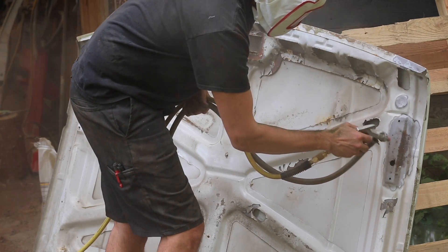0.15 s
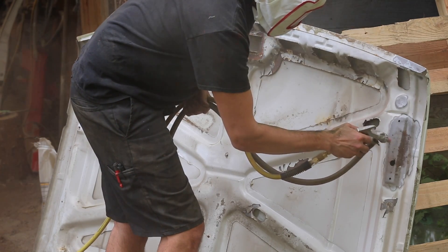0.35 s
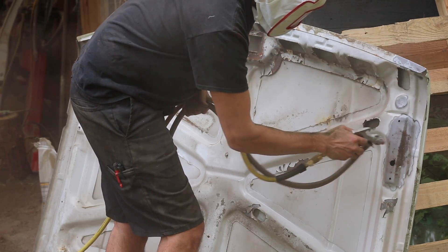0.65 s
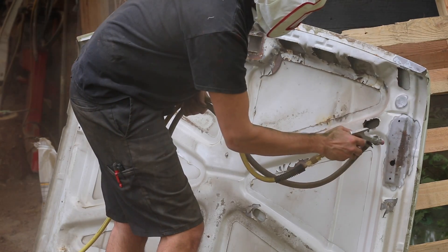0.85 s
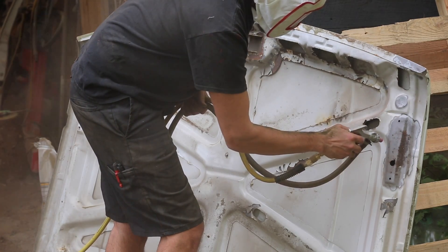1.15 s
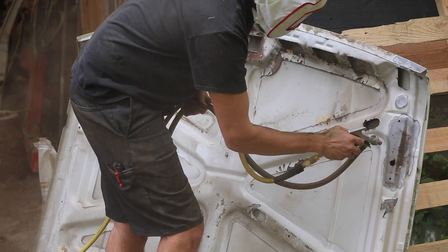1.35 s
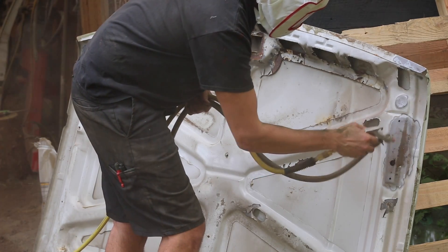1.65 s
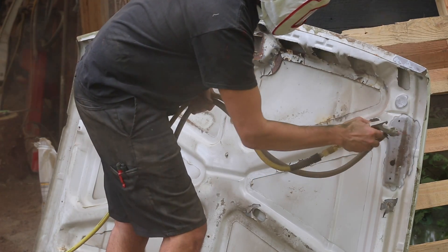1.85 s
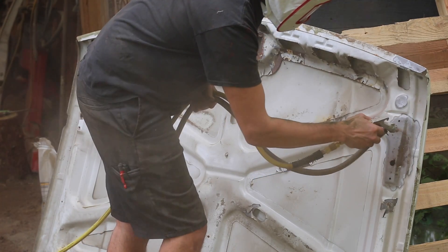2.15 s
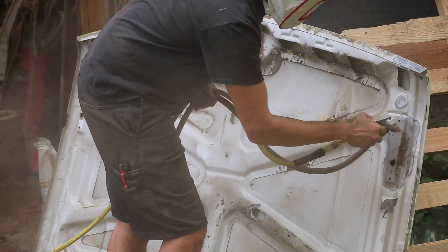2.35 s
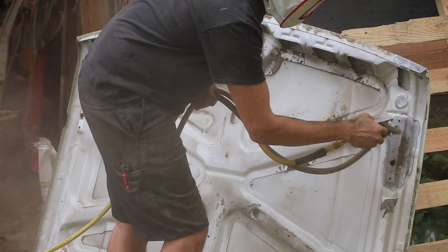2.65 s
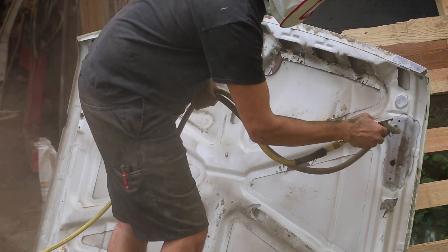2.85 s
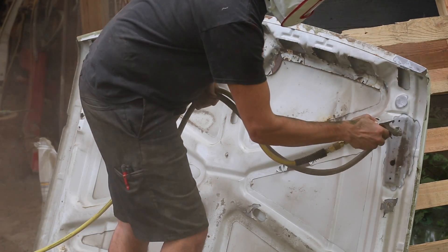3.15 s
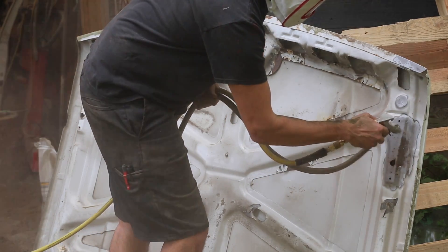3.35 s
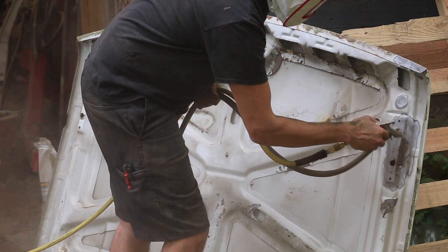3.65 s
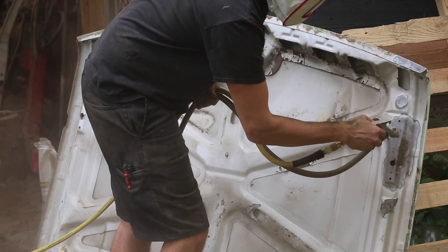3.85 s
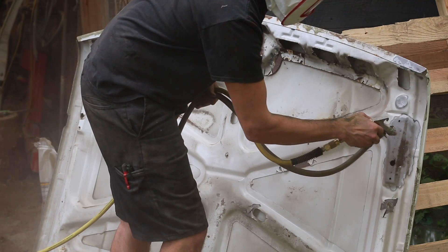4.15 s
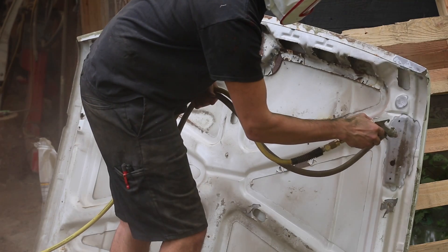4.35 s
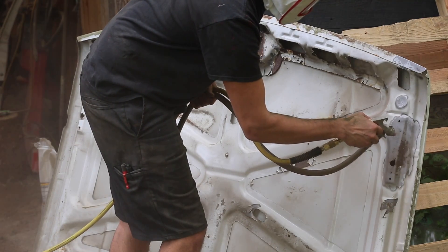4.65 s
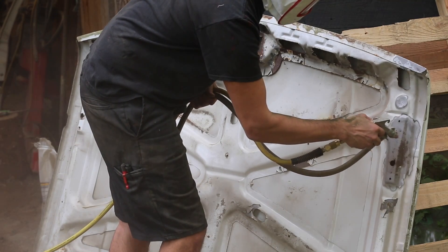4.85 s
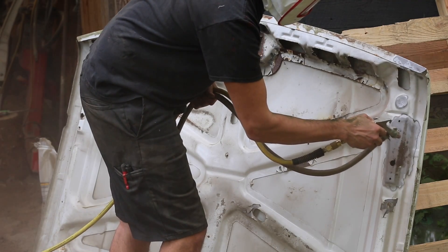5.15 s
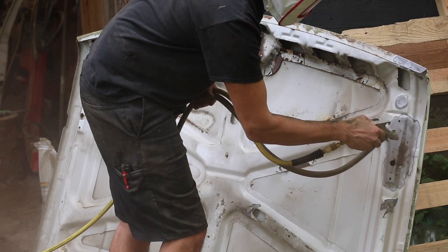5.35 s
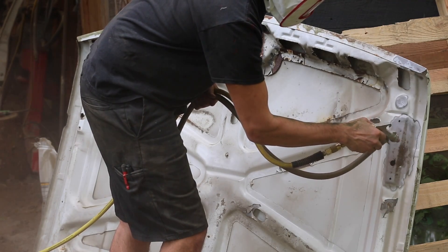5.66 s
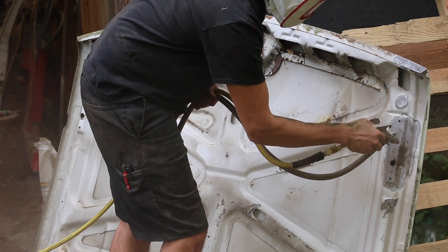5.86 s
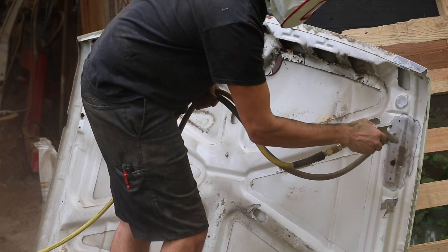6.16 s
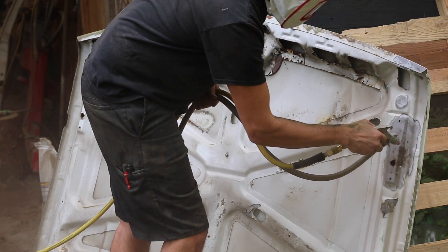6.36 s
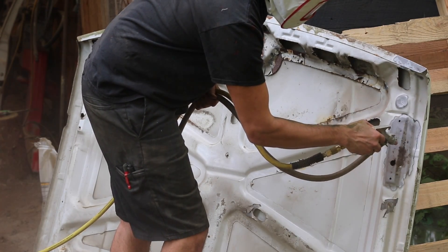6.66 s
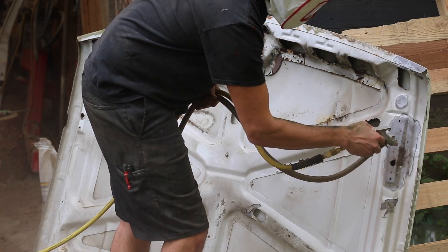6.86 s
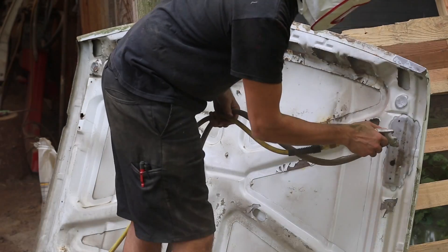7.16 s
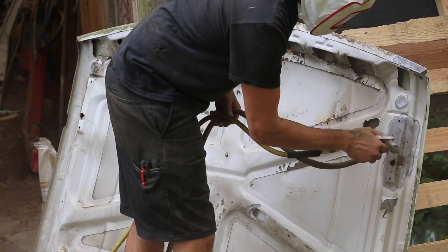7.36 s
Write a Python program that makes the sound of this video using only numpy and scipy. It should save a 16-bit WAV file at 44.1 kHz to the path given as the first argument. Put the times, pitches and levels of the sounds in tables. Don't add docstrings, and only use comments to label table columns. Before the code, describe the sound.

In a barn, a hand-held blasting gun sprays grit nonstop against a bare, pressed steel vehicle panel. The bright hiss swells and dips about four times a second as the wrist sweeps. Grains rattle thinly, hollows answer with short hollow roars and breathy hoots. A piston compressor drones very faintly far off. One close microphone, almost mono, gets buffeted by low air in the last second or so.

```python
import sys
import numpy as np
from scipy import signal
from scipy.fft import rfft, irfft, next_fast_len
from scipy.io import wavfile
from scipy.ndimage import uniform_filter1d, map_coordinates

SR = 44100
rng = np.random.default_rng(int(sys.argv[2]) if len(sys.argv) > 2 else 0)


def store_wav(level_fs):
    pcm = np.round(np.clip(np.atleast_2d(level_fs), -1, 1) * 32767)
    wavfile.write(sys.argv[1], SR, pcm.T.astype(np.int16))


def boost(x):
    u = np.asarray(x, float) / 20
    return 10 ** u


N = 331191
TOP_HZ = 15740

# time [s], pressure on the steel [dB], slant [0 square on to 1.5 glancing].
HOLD = [(0.0, -34.5, 0.69), (0.43, -34.5, 1.42), (0.817, -38.5, 0.4), (1.293, -35.5, 1.8),
        (1.519, -37, 1.7), (1.57, -37, 0.15), (2.27, -35.5, 0.14), (2.92, -40.0, 0.39),
        (3.37, -36.5, -0.043), (3.983, -35, -0.55), (4.392, -35.5, -0.32), (5.029, -35, -0.66),
        (5.73, -34.5, -0.27), (6.144, -36.5, 0.29), (6.37, -34.5, 0.32), (6.63, -32, -0.55),
        (7.177, -32.5, -0.6), (7.19, -35, 0.21)]
# middle [s], swell [dB], length [s], extra ring of the skin [dB].
SWEEPS = [(0.257, 4, 0.18, -0.5), (0.539, 7, 0.23, -1), (0.714, 9.5, 0.15, 1), (0.947, 7, 0.13, 2),
          (1.149, 7.5, 0.11, -2), (1.657, 6.5, 0.14, 5.5), (1.933, 5.5, 0.18, 5.5), (2.149, 6, 0.15, 2),
          (2.438, 6, 0.18, 0), (2.616, 7.5, 0.18, -0.5), (2.846, 14, 0.2, -1), (3.054, 12.5, 0.18, -0.5),
          (3.256, 9, 0.2, 1.5), (3.398, 5.5, 0.095, 0.5), (3.554, 6, 0.19, -2), (3.78, 4.5, 0.15, 3),
          (4.011, 4.5, 0.16, 2), (4.23, 4, 0.17, 0.5), (4.59, 1.5, 0.45, 2.5), (4.905, 8.5, 0.128, 3),
          (5.127, 8.5, 0.077, 3.5), (5.293, 6, 0.16, -0.5), (5.523, 4.5, 0.079, -0.5),
          (5.91, 2.5, 0.2, -1.5), (6.218, 7.5, 0.086, -1), (6.446, 8, 0.078, -0.5), (6.686, 4, 0.1, 1),
          (6.892, 6.5, 0.12, -1), (7.14, 3, 0.077, 2.5), (7.377, 2, 0.083, -2)]
# middle [s], roar [dB], length [s], extra whistle of the seam [dB].
HOLLOWS = [(0.066, -0.5, 0.15, 10), (0.226, 3, 0.24, -1), (0.379, 1.5, 0.26, 1), (0.53, 4, 0.21, 0),
           (.67, -1, 0.045, -2), (0.735, 5.5, 0.1, 5), (0.944, 6, 0.088, 6.5), (1.14, 4, 0.07, 0),
           (1.205, 0, .06, -2), (1.553, 3, 0.038, 1.5), (1.9, -0.5, .06, 4), (2.13, 1.5, 0.048, 3),
           (2.454, 2.5, 0.035, 3), (2.82, 2.5, 0.11, 0), (2.712, 2, 0.049, 4), (3.074, 3, 0.077, -7),
           (3.26, 3, 0.11, -1), (3.408, 2, 0.069, 8), (3.52, 1, 0.099, -1), (3.62, 1.5, 0.09, 5),
           (3.813, 2.5, 0.075, -4.5), (3.994, 4.5, 0.1, -5), (4.08, 3.5, 0.05, 4), (4.2, 3, 0.11, 2),
           (4.3, 2.5, 0.086, -6), (4.44, 2, .07, 3), (4.57, 1.5, 0.11, -.6), (4.766, 4, 0.045, -4),
           (4.91, 6.5, 0.16, -1.4), (5.128, 7, 0.08, -.6), (5.29, 3.5, 0.11, -5), (5.54, 2.5, 0.076, 1),
           (5.66, 3.5, 0.071, -4), (5.88, 4.5, 0.052, -5), (6.22, 3, 0.076, -6), (6.455, 5, 0.09, 1),
           (6.691, 5, 0.078, 5), (6.895, 5.5, 0.11, 3), (7.128, 6, 0.09, 6), (7.362, 0.5, 0.1, 1)]
# middle [s], splash [dB], length [s].
SPLASHES = [(0.781, 8, 0.14), (0.887, 5.2, 0.089), (0.987, 5.5, 0.23), (1.215, 2.5, 0.058),
            (1.56, 13.5, 0.074), (1.806, 4, 0.17), (2.044, 2, 0.046), (2.181, 1.5, 0.053),
            (2.384, 2.5, 0.19), (2.711, 9, 0.086), (3.032, 0.5, 0.054), (3.26, 3.5, 0.074),
            (3.721, 4.5, 0.2), (4.091, 5, 0.072), (4.306, 7, 0.064), (4.52, 0.5, 0.083),
            (4.764, 9.5, 0.043), (5.081, 5, 0.052), (5.303, 3, 0.084), (5.65, 6.5, 0.063),
            (5.874, 8, 0.063), (6.4, 4, 0.04), (7.018, 3, 0.063), (7.108, 6.5, 0.086), (7.505, 8, 0.033)]
# middle [s], level [dB].
TURNS = [(.09, -1), (.67, -4), (.78, 0), (1.06, -0.5), (1.17, -2.5), (1.29, -3), (1.4, -2), (1.61, 1),
         (1.76, -3), (1.86, -3), (1.995, -3), (2.09, -4.5), (2.23, -2), (2.325, -2), (2.46, -3), (2.66, -2),
         (2.77, -3), (2.9, -3), (3.085, -2), (3.34, -1), (3.67, -3.5), (3.82, -2.5), (3.92, -1),
         (4.165, -2.5), (4.38, -3.5), (4.59, -.6), (4.825, -3), (5.17, -2), (5.37, -5), (5.47, -2),
         (5.59, 1.5), (5.95, -1.5), (6.14, -3), (6.28, 1), (6.48, -1), (6.84, -3), (7.27, -3), (7.39, -2.5),
         (7.46, -4)]
# middle [s], grit [dB], length [s], jet [dB].
UNEVEN = [(.17, 0, .05, 0.5), (.4, -0.2, 0.13, -1.5), (.6, -2, 0.14, -1), (.83, 0.5, 0.13, -2),
          (1.3, 0.5, .2, -0.2), (1.49, .4, .08, -1.8), (1.61, 0.5, 0.088, 0), (1.72, 2, .05, 1),
          (1.79, 0, .06, 0.5), (1.86, .4, 0.064, 0.5), (2.02, -0.5, 0.074, 0), (2.15, -1.5, .06, -1),
          (2.23, 0.5, .06, 1), (2.36, 2.5, .06, 0.5), (2.68, 0, 0.11, 0), (2.86, -1.5, 0.08, -1.5),
          (3.09, -1, .1, -0.5), (3.28, 1.8, .08, 0.5), (3.7, 3, .05, -0.5), (3.83, 0.5, 0.093, -0.5),
          (3.97, -.4, 0.1, -0.5), (4.37, -1, 0.15, -0.3), (4.68, 0.5, 0.087, .6), (4.85, 0.5, .1, -0.2),
          (4.95, -0.5, .05, 0.5), (5.07, 1.1, 0.055, -1), (5.21, -2, 0.081, -0.2), (5.43, -1, 0.14, -0.5),
          (5.79, -1, 0.11, 0.5), (5.92, -1.5, .08, 0.3), (6.01, 2, 0.065, .4), (6.42, 0.5, .08, -0.5),
          (6.59, -0.5, .06, -1.5), (6.66, 0, .09, 0.8), (6.7, -1.5, .08, 0.5), (6.77, 0, .05, 0),
          (6.86, -0.3, .16, -0.4), (6.99, -0.5, .1, -0.8), (7.17, 0.5, 0.037, -1), (7.26, 1, .07, -1),
          (7.39, 0.8, .14, 1.5)]


def unit(x):
    return x / np.sqrt(np.mean(x ** 2) + 1e-20)


def curves(rows):
    times, *columns = np.transpose(rows)
    return [np.interp(np.arange(N) / SR, times, values) for values in columns]


def wobble(rate):
    knots = rng.standard_normal(int(N * rate / SR) + 4)
    return map_coordinates(knots, [np.arange(N) * rate / SR])


def swells(rows, column=1, share=1):
    bluntness = 2.17
    t, rows = np.arange(0, N + 256, 256) / SR, np.array(rows)
    offset = 2 * (t[:, None] - rows[:, 0]) / (share * rows[:, 2])
    bells = np.exp(-np.abs(offset) ** bluntness)
    return np.interp(np.arange(N) / SR, t, bells @ rows[:, column])


def filtered(x, response):
    size = next_fast_len(len(x) + 8192)
    return irfft(rfft(x, size) * response(np.fft.rfftfreq(size, 1 / SR)), size)[:len(x)]


def colour(points):
    f, db = np.transpose(points)
    return lambda hz: boost(np.interp(np.log(hz + 1), np.log(f), db))


def modes(rows):
    return lambda hz: np.sqrt(sum(boost(2 * db) / (1 + (2 * (hz - centre) / width) ** 2) ** 2
                                  for centre, width, db in rows))


def levels(*layers):
    # rest level [dB], then dB per unit of pressure, slant, sweep, hollow and splash.
    answer = dict(jet=(-36, 1, -2, 0.61, -0.46, 0.05), grit=(-39, 1.77, -1.23, 1, -0.81, 0.19),
              fizz=(-38.5, 2.5, 2, 1.2359, -0.82, 0.7148), box=(-60, 1.5, 4, 0.4847, 1.32, 0.58),
              seam=(-60.5, 0.3, 0.8, 0.33, 1, 0.28), rib=(-54.5, 1.5, 0, 0.77, -0.95, 0.36),
              skin=(-46, 1.44, -1, 0.73, -0.68, 0.09))
    usual_db = -36
    pressure_db, slant = curves(HOLD)
    gestures = np.array([pressure_db - usual_db, slant, swells(SWEEPS), swells(HOLLOWS), swells(SPLASHES)])
    return [answer[name][0] + np.array(answer[name][1:]) @ gestures for name in layers]


def blast(grit_db, spread_db, patchy_db):
    z = signal.stft(rng.standard_normal(N), nperseg=512)[2]
    field = uniform_filter1d(rng.standard_normal(z.shape), size=8, axis=0)
    field = uniform_filter1d(field, size=8, axis=1)
    air = signal.istft(z * boost(patchy_db * unit(field)), nperseg=512)[1][:N]
    strikes = rng.uniform(size=N) < 3000 / SR
    sizes = boost(spread_db * np.minimum(rng.exponential(size=N), 4))
    grains = strikes * rng.choice([-1, 1], N) * sizes
    return unit(air) + boost(grit_db) * unit(grains)


def shimmer(x, response, depth_db):
    hz, s, z = signal.stft(x, SR, nperseg=1024)
    ripple = unit(uniform_filter1d(rng.standard_normal(z.shape), size=10, axis=1))
    shaped = z * response(hz[:, None], s) * boost(depth_db * ripple)
    return unit(signal.istft(shaped, nperseg=1024)[1][:N])


def scraps():
    # time [s], lower edge [Hz], upper edge [Hz], level [dB rms].
    scrap_rows = [(0.606, 10900, 12400, -43), (0.607, 4700, 6300, -45), (.84, 5500, 6900, -50),
                  (.84, 13800, 15900, -47), (1.118, 6900, 9700, -41), (1.468, 6300, 8300, -49),
                  (1.468, 4100, 5200, -53), (5.761, 4700, 5800, -50), (1.373, 4100, 6300, -48),
                  (1.906, 12300, 13800, -44), (1.908, 9600, 11700, -44), (2.976, 6300, 8300, -42),
                  (3.325, 11700, 13100, -44), (3.51, 10300, 11700, -43), (4.418, 4700, 5800, -47),
                  (5.112, 9600, 11000, -45), (5.204, 6400, 8300, -41), (5.62, 12400, 15200, -41),
                  (5.621, 8300, 9600, -45), (5.761, 11700, 14500, -44), (6.04, 4100, 8340, -42),
                  (6.272, 7600, 9600, -45), (6.344, 12450, 13800, -44), (6.458, 9000, 10300, -43),
                  (6.458, 13000, 14500, -43), (6.504, 7600, 9000, -42), (6.504, 14500, 15700, -44),
                  (6.575, 14500, 15800, -42), (6.597, 11000, 12400, -42), (6.665, 13800, 15900, -42),
                  (6.667, 5200, 6300, -43), (6.69, 4200, 5200, -42), (6.69, 5700, 7600, -35),
                  (6.69, 8300, 9600, -40), (6.898, 13000, 15200, -40)]
    hop, first = 1024, 142
    side, n = np.zeros(N), np.arange(2 * hop) + .5
    window = np.sin(np.pi * n / hop / 2)
    for s, lo_hz, hi_hz, db in scrap_rows:
        lo, hi = round(lo_hz * 2 * hop / SR), round(min(hi_hz, TOP_HZ) * 2 * hop / SR)
        bins = np.arange(lo, hi) + .5
        cosines = np.cos(np.pi / hop * np.outer(n + hop / 2, bins))
        burst = unit(cosines @ rng.standard_normal(len(bins)))
        start = first + hop * (round((s * SR - first) / hop) - 1)
        side[start:][:2 * hop] += boost(db + .8) * burst * window
    return side


def compressor():
    # multiple of the crank rate, level [dB rms].
    pump = [(2, -74), (3, -79), (4, -68), (5, -80.5), (6, -67), (7, -86), (8, -69), (9, -73), (10, -81),
            (11, -69), (12, -84), (14, -83), (15, -67), (16, -83), (17, -70), (18, -79), (19, -74),
            (20, -78), (21, -68), (25, -70)]
    crank_hz, mains_hz = 23.123, 120.05
    stroke_turn, loose = .25, .3
    t = np.arange(N) / SR

    def tone(hz, db, turn):
        level = np.sqrt(2) * boost(db + 0.41 * wobble(3.18))
        return level * np.sin(2 * np.pi * (hz * t + turn + loose * rng.uniform()))

    drone = sum(tone(k * crank_hz, db, (k - 2) * stroke_turn - loose / 2) for k, db in pump)
    return drone + tone(mains_hz, -72, 0)


def buffet():
    # frequency [Hz], level [dB].
    gust_colour = [(15, -45), (30, -7), (60, -4), (120, -2), (220, -7), (300, -8), (500, 0), (900, -60)]
    # middle [s], rise over the rest level [dB], length [s].
    gusts = [
        (1.7, 8, .5),
        (3.25, 8, .5),
        (4.95, 14, .4),
        (6.43, 23.7, 0.23),
        (6.7, 22, 0.45),
        (7.2, 21, 0.73),
    ]
    rest_db = -94.5
    level_db = rest_db + swells(gusts) + 11.5 + 2.4 * wobble(9.6)
    return boost(level_db) * unit(filtered(rng.standard_normal(N), colour(gust_colour)))


def holes():
    # middle [s], level [dB rms], length [s], pitch [Hz].
    hoots = [(.07, -50, .05, 945), (.1, -51, .04, 720), (.12, -53, .03, 850), (.165, -50, .04, 530),
             (.23, -51, .05, 520), (.32, -49, .07, 525), (.39, -52, .04, 485), (.465, -51, .05, 540),
             (.53, -54, .05, 740), (0.528, -54, .05, 345), (.6, -51, .05, 480), (4.91, -56, .05, 520),
             (.73, -51, .06, 530), (.95, -47, .06, 540), (1.556, -47.5, .04, 640), (4.074, -46, .022, 882),
             (5.129, -53, 0.041, 640), (5.875, -59, 0.046, 560), (6.875, -48, 0.046, 680),
             (7.122, -44, 0.046, 600), (7.364, -51, 0.061, 600)]
    sag = 0.1104
    out, waver = np.zeros(N), 0.0587 * wobble(120)
    for s, db, length, hz in hoots:
        n = np.arange(max(round((s - 2 * length) * SR), 0), min(round((s + 2 * length) * SR), N))
        u = (n / SR - s) / length
        pitch = hz * (1 - sag * u + waver[n])
        bell = np.exp(-(2 * u) ** 2)
        out[n] += np.sqrt(2) * boost(db) * bell * np.sin(2 * np.pi * np.cumsum(pitch) / SR)
    return out


def panel():
    # frequency [Hz], width [Hz], level [dB].
    box_modes, seam_modes = [(326, 77, -7), (420, 89, -9.5), (512, 89, 0), (600, 130, -3.5)], [(740, 92, 0.33), (844, 79, -1.8)]
    rib_modes, skin_modes = [(942, 144, 0.34), (1128, 420, -1.5), (1316, 130, 0.47)], [(1508, 210, -.6), (1950, 650, 0.72), (2356, 400, -0.6)]
    # middle [s], level [dB], length [s].
    skin_swells = [(.15, -1, .2), (.96, -2, .08), (1.44, 2, .1), (1.645, 6, 0.055), (1.7, 3, .04), (1.8, -2, .03),
                   (1.9, 0, .05), (1.8, 1.5, .06), (1.96, 1, .04), (2.165, 3.5, .07), (3.51, -0.5, .12),
                   (4.02, -2.5, 0.11), (4.23, 2, .1), (4.8, 0, .16), (5.44, -2.5, .1), (5.79, 1, 0.045),
                   (2.4, 4.5, .06), (7.04, 2, .05), (6.89, -1, .12), (5.3, 2, .08), (5.9, 0, .06),
                   (6.32, -2, .07), (7.2, -7, .04)]
    # frequency [Hz], width [Hz], level [dB].
    crown = [(2300, 540, -.1)]
    # middle [s], level [dB], length [s].
    square = [
        (1.645, 2.2, 0.04),
        (3.98, 3, .2),
        (7.135, 4, 0.037),
    ]
    # frequency [Hz], width [Hz], level [dB].
    cancels = [(1310, 130, -.1), (1760, 73, -.1)]
    cancel_by_slant = 0.41

    box_db, seam_db, rib_db, skin_db = levels('box', 'seam', 'rib', 'skin')
    ring_db = 0.69 * swells(SWEEPS, -1, share=0.98)
    whistle_db = swells(HOLLOWS, -1)
    seam_db = seam_db + 1.06 * whistle_db
    skin_db = skin_db + ring_db + swells(skin_swells)
    rib_db = rib_db + 0.05 * ring_db + 0.35 * whistle_db

    def driven(rows, *grain):
        return unit(filtered(blast(*grain), modes(rows)))

    box = boost(box_db - 1.0 + 0.29 * wobble(25)) * driven(box_modes, -31, 4.0, 1.0)
    seam = boost(seam_db - 0.2 + .8 * wobble(25)) * driven(seam_modes, -22, 2.5, 2.9)
    rib = boost(rib_db + 0.83 + 0.96 * wobble(25)) * driven(rib_modes, -24, 3.1, 1.0)
    skin = boost(skin_db - 0.1 + 0.31 * wobble(30)) * driven(skin_modes, -17.5, 1.5, 1.0)
    skin = skin + (boost(swells(square)) - 1) * filtered(skin, modes(crown))
    share = np.clip(cancel_by_slant * curves(HOLD)[1], 0, .9)
    return box + seam + rib + skin - share * filtered(rib + skin, modes(cancels))


def dip(creep=.15):
    # time [s], depth [dB], recovery [s].
    dips = [
        (7.07, -7, 0.034),
    ]
    suddenness = 120
    t, loss_db = np.arange(N) / SR, np.zeros(N)
    for s, db, back in dips:
        u = (t - s) / back
        snap = 1 / (1 + np.exp(np.clip(suddenness * (u - 1), -50, 50)))
        loss_db += db * (u > 0) * np.clip(1 - creep * u, 0, 1) * snap
    return loss_db


def glint(hz, s):
    # middle [s], level [dB], length [s], centre [Hz].
    glints = [(.02, 3, .06, 11500), (1.17, 3, 0.76, 5000), (1.1, 1, .6, 2980), (1.1, -1, 0.81, 6600),
              (2.2, -1, 1.1, 5300), (2.7, 2, 0.59, 7700), (4.55, 1.5, .1, 5500), (1.35, -3, .15, 13200),
              (1.55, -4, .06, 12300), (1.63, -4, .08, 10000), (1.65, -3, .1, 15000), (1.9, -5, .12, 10200),
              (2.05, -3, .07, 11500), (2.17, -4, .08, 15300), (2.27, -3, .08, 11600), (2.4, -2, .1, 10300),
              (2.5, 3, .1, 13500), (2.75, 3, .06, 13600), (3.37, 3, .05, 13600), (3.52, -3, .07, 14300),
              (3.87, 8, .09, 13200), (4.07, 4, .12, 13300), (4.45, 3, .1, 15000), (4.53, 5, .1, 13800),
              (4.9, 3, .05, 11500), (4.9, -3, .06, 15000), (5.13, -5, .06, 10000), (5.68, -3, .06, 11400),
              (6.07, 3, .1, 14300), (6.45, -3, .08, 10000), (6.85, -2, .08, 9600), (7.1, -3, .1, 11300),
              (7.35, 3, .1, 11000)]
    width_hz = 1200
    at, db, length, centre = np.transpose(glints)
    pitch = np.exp(-(2 * (hz - centre) / width_hz) ** 2)
    moment = np.exp(-(2 * (s - at[:, None]) / length[:, None]) ** 2)
    return boost((pitch * db) @ moment)


def wrist():
    turn_s = 0.036
    return swells([(s, db, turn_s) for s, db in TURNS])


def jet_hiss(flutter):
    # frequency [Hz], level [dB].
    jet_colour = [(2000, -29), (2700, -11.5), (3450, -3), (3930, -0.1), (4150, -1.5), (4400, -6.5),
                  (4800, -11.5), (5800, -45)]
    # time [s], frequency [Hz].
    pitch = [(0.0, 3870), (0.21, 3870), (0.74, 3880), (0.83, 3570), (1.57, 3750), (3.79, 3790),
             (4.04, 3660), (4.29, 3730), (6.88, 3750), (7.22, 3840), (7.51, 3770)]

    def slide(hz, s):
        stretch = (3850 / np.interp(s, *np.transpose(pitch))) ** 0.89
        return colour(jet_colour)(hz * stretch) * glint(hz, s)

    level_db = levels('jet')[0] + swells(UNEVEN, -1) + .5 + 0.2 * flutter
    return boost(level_db) * shimmer(blast(-20.5, 2.1, patchy_db=.5), slide, depth_db=1.9)


def grit_rattle(flutter):
    # frequency [Hz], level [dB].
    grit_colour = [(3500, -40), (4700, -10), (5300, -2), (6000, -0.5), (7400, 0), (8600, -2), (10000, -34),
                   (13000, -34)]
    level_db = levels('grit')[0] + swells(UNEVEN) + 0.12 * wrist()
    level_db = level_db + 0.18 + flutter + 0.22 * wobble(11)
    rattle = shimmer(blast(-9.0, 2.9, patchy_db=-0.5),
                     lambda hz, s: colour(grit_colour)(hz) * glint(hz, s), depth_db=1.5)
    return boost(level_db) * rattle


def spray_fizz(flutter):
    # frequency [Hz], level [dB].
    fizz_colour = [(6000, -29), (8000, -18), (8700, 1), (9200, 1.5), (10500, 0.5), (12300, 2),
                   (14000, -0.5), (15700, -2.5), (17000, -5.5)]
    # frequency [Hz], width [Hz], level [dB].
    nozzle = [(12600, 1900, -.1)]
    # middle [s], level [dB], length [s].
    ring_swells = [(.12, 1, .08), (1.58, -6, .08), (1.68, 3, .1), (1.75, 5, .12), (2.18, -4.5, .1), (2.27, 3, .06),
                   (2.5, -1, .14), (2.93, 3.5, .05), (3.16, 2, .08), (3.63, 3, .09), (4.49, 3, .12), (4.8, 3, .05),
                   (5.06, -2.5, .1), (5.43, 3, .08), (5.75, 0.5, 0.32), (6.1, 3, .18), (6.26, -3, .08),
                   (7.32, -2, .1)]
    level_db = levels('fizz')[0] + wrist() + .4 * swells(UNEVEN)
    level_db = level_db + dip(creep=.7) - dip()
    level_db = level_db + 0.78 + 0.9 * flutter
    fizz = boost(level_db) * shimmer(blast(-13, 2.1, patchy_db=.7),
                                   lambda hz, s: colour(fizz_colour)(hz) * glint(hz, s), depth_db=2.2)
    nozzle_db = 0.34 * swells(SPLASHES) - 0.33 * swells(SWEEPS) + swells(ring_swells) + 0.97 * wobble(6)
    nozzle_gain = boost(np.minimum(nozzle_db, 3.5)) - 1
    return fizz + nozzle_gain * filtered(fizz, modes(nozzle))


def gun():
    flutter = 0.44 * wobble(23) + .5 * wobble(90)
    return jet_hiss(flutter) + grit_rattle(flutter) + spray_fizz(flutter)


def scene():
    low_cut_hz = 60
    spray = filtered(gun() + panel() + holes(), lambda hz: hz ** 2 / (hz ** 2 + low_cut_hz ** 2))
    mono = boost(dip()) * spray + compressor() + buffet()
    return np.array([mono, mono])


def roll_off(x):
    return signal.sosfilt(signal.butter(12, 17060, fs=SR, output="sos"), x)


def record(dry):
    mono = dry[0] / (1 + np.abs(dry[0] / .22) ** 4) ** (1 / 4)
    mono = filtered(mono, lambda hz: hz < TOP_HZ)
    side = scraps()
    return roll_off(np.array([mono + side, mono - side]))


dry = scene()
out = record(dry)
store_wav(out)
```